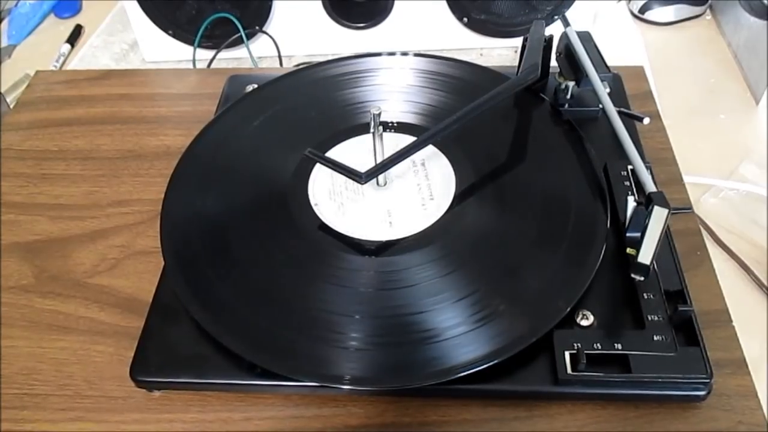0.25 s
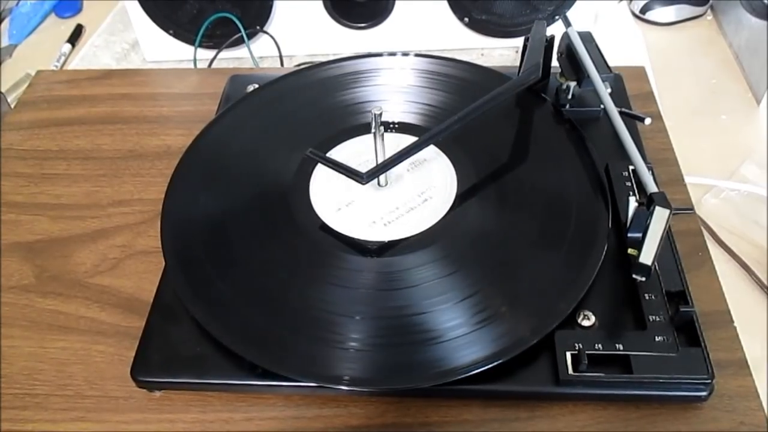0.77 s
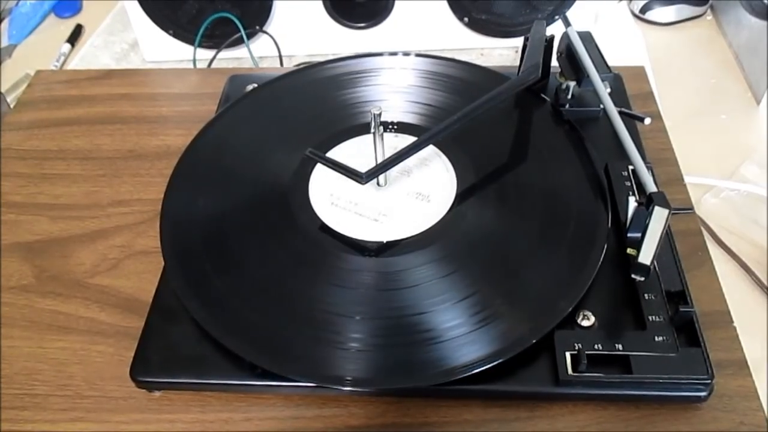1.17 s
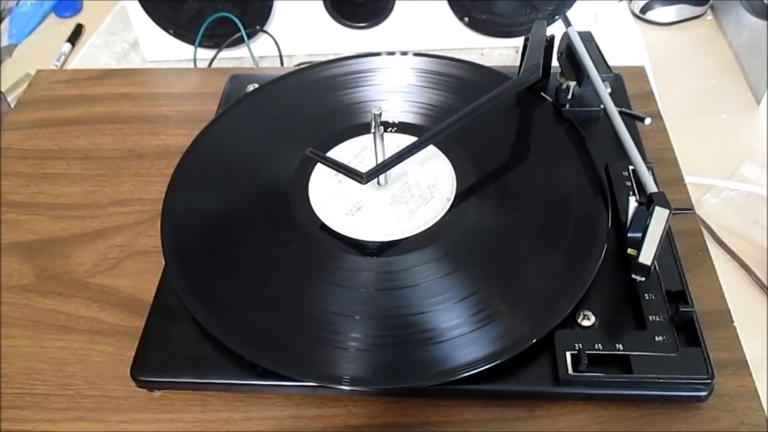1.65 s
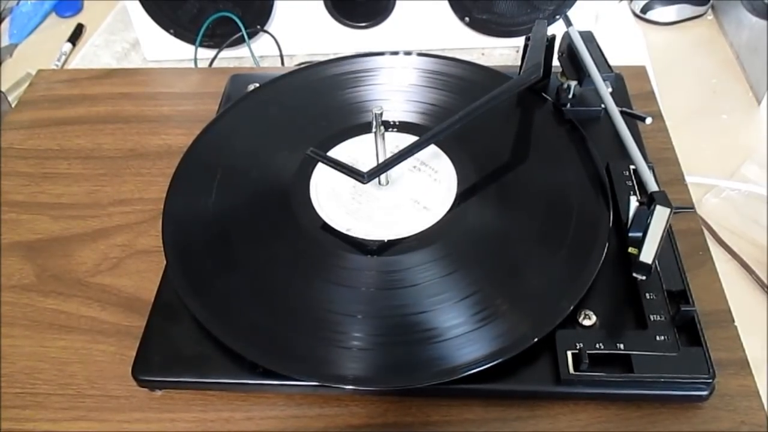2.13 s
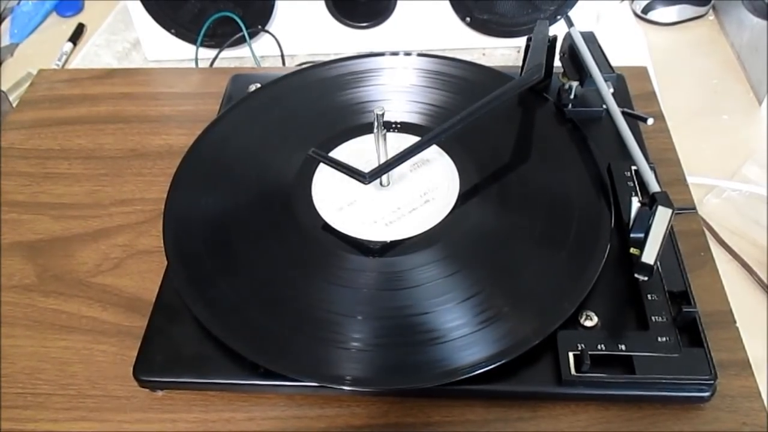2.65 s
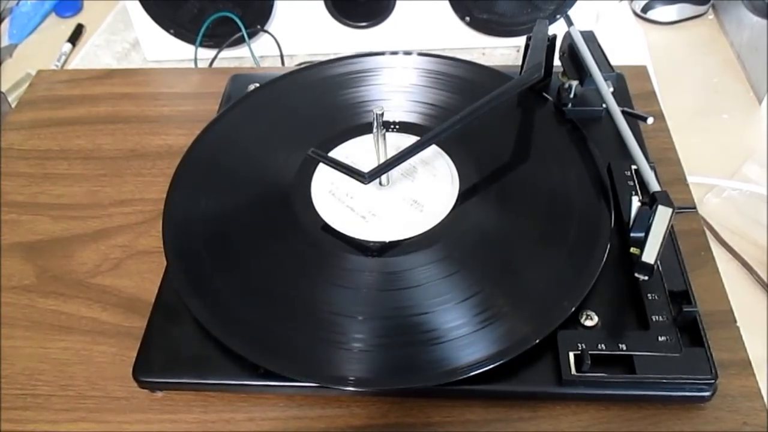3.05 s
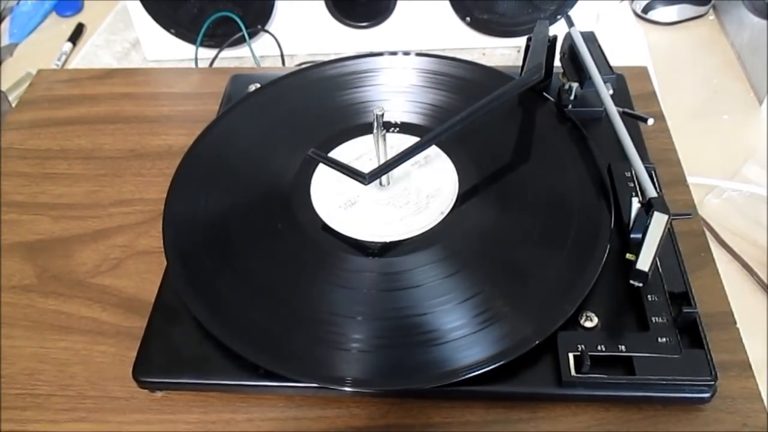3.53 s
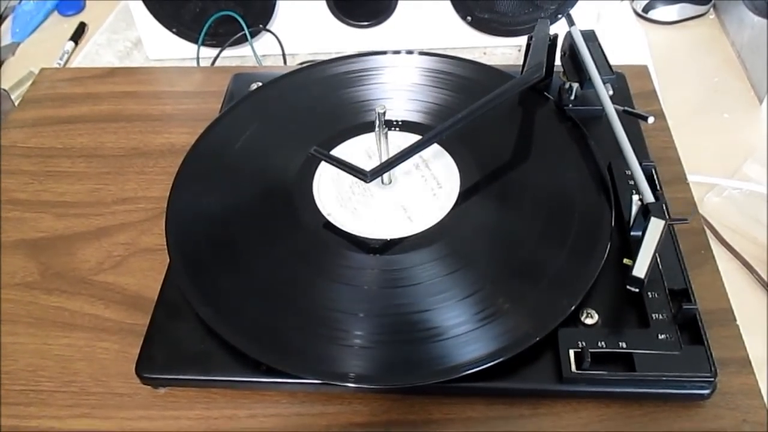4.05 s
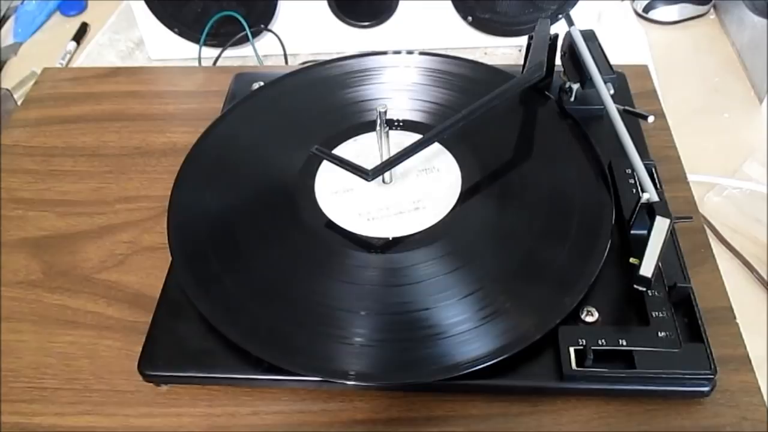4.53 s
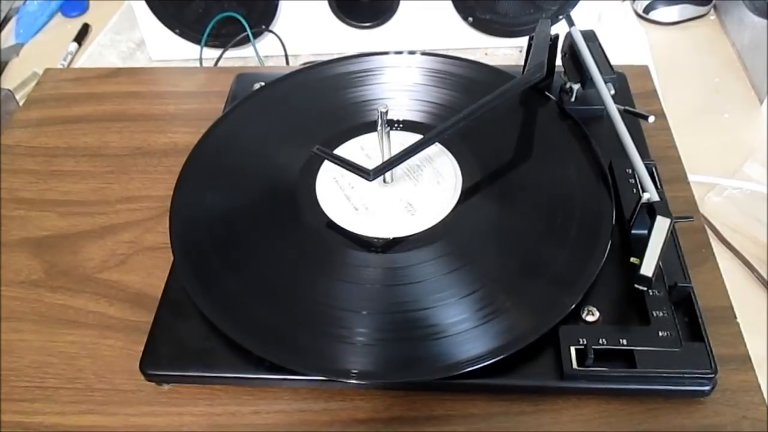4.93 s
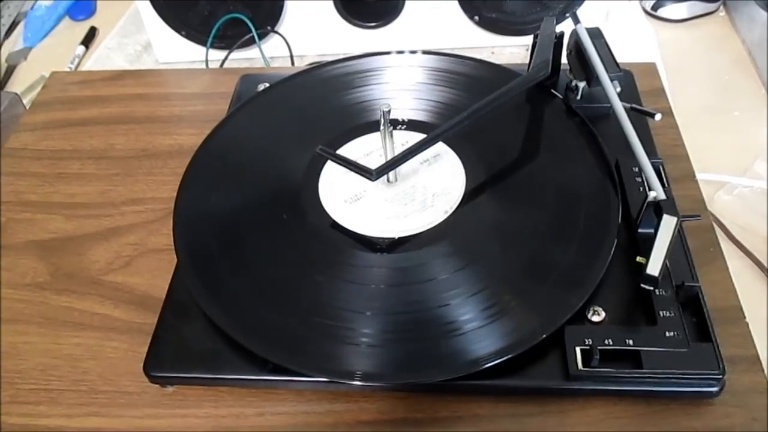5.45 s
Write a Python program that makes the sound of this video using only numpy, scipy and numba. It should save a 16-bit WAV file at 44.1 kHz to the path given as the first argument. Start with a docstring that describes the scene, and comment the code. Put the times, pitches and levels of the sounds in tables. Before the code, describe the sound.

A record changer turntable hums and rumbles, its metal levers clicking and knocking irregularly before one loud clunk.

```python
"""A small room: a record changer runs through its cycle. The motor hums, the platter rumbles, the
idler wheel scuffs. Steel levers click and knock on the deck; at last a sprung lever snaps home
and the wooden plinth booms. The clunk overloads the camera, whose gain ducks and creeps back;
its electronics hiss and whine faintly."""
import sys
import numpy as np
from scipy import signal
from scipy.fft import rfft, irfft, next_fast_len
from scipy.io import wavfile
from scipy.ndimage import map_coordinates
from numba import njit

SR = 44100
rng = np.random.default_rng(int(sys.argv[2]) if len(sys.argv) > 2 else 0)


def int16_out(signal):
    """Quantize to a 16-bit WAV file."""
    q = np.round(np.clip(np.atleast_2d(signal).T, -1, 1) * 32767)
    wavfile.write(sys.argv[1], SR, q.astype(np.int16))


N = 250532


def clunk():
    """Heavy blows make the plinth boom; the last is the sprung lever hitting its stop."""
    # blows on the plinth: t/s, level/dB
    thuds = [(2.047, -33), (3.739, -31.5), (4.182, -33.5), (4.4264, -11), (4.4487, 3)]
    # modes of plinth and deck springs: f/Hz, level/dB, t60/s
    plinth_modes = [(65.6, -24, .3), (136, -14, 0.18), (185.5, -6, 0.15), (221, -5.5, 0.19),
                    (272, 3, 0.048), (336, -12.5, .42), (361.6, -3.5, .06), (404, -8.5, 0.039),
                    (500, -13.5, .07), (1320, -40.5, 0.5)]
    out = np.zeros(N)
    for start_s, db in thuds:
        boom = amp(db) * ring(plinth_modes, attack_s=0.0007, scatter_db=0, disorder_rad=0.41)
        add(out, start_s, room(boom, wet_db=-14))
    low_cut_hz = 115  # a small box radiates little deep bass
    return signal.sosfilt(signal.butter(2, low_cut_hz, "high", fs=SR, output="sos"), out)


def sprung_lever():
    """The lever leaves its catch, bounces faster and harder along its guide, then hits the stop."""
    # catch, stop: t/s, clack level/dB, centre f/Hz, tick level/dB, knock level/dB
    snaps = [(4.4264, -7.5, 1420, -20.5, -20), (4.4472, -6, 1187, -19, 2.5)]
    out = np.zeros(N)
    pressed_t60_s = 0.03  # pressed against catch or stop, it rings only briefly
    damping = amp(-60 * np.arange(SR // 2) / SR / pressed_t60_s)
    for start_s, db, centre_hz, tick_db, knock_db in snaps:
        add(out, start_s, room(clack(db, centre_hz) * damping, wet_db=-10))
        add(out, start_s, room(tick(tick_db, t60_s=0.01), wet_db=-10.5))
        add(out, start_s, room(knock(knock_db), wet_db=-13.5))
    bounce_s, flight_s = snaps[0][0], 0.0088
    for db in (-27, -21.5):
        bounce_s += flight_s
        flight_s *= 0.7
        bounce = clack(db, centre_hz=3200) + tick(db - 8) + knock(db + 4)
        add(out, bounce_s, room(bounce, wet_db=-8.5))
    return out


def levers():
    """Each lever touches, swings the deck and seats with a duller clack; a light pawl ticks thinly."""
    # lever clacks and knocks, then two faint ticks after the clunk:
    # t/s, clack level/dB, centre f/Hz, knock level/dB
    contacts = [(1.2381, -19, 2480, -18.5), (1.627, -56, 1310, -40.5), (1.9088, -41.5, 1290, -36),
                (2.0447, -60, 3450, -34), (2.928, -48, 1260, -32), (3.168, -43.5, 1380, -40),
                (3.354, -32, 2070, -38), (3.44, -43.5, 1490, -36.5), (3.566, -49, 1500, -33.5),
                (3.727, -42, 2980, -46), (3.738, -30.5, 1247, -19.5), (3.7512, -26.5, 1640, -30),
                (3.856, -32.5, 2000, -35), (3.8795, -49, 3600, -47), (3.9653, -52, 3140, -51),
                (4.083, -53, 3660, -53.5), (4.1805, -38, 1156, -23.5), (4.342, -58.5, 2600, -43),
                (4.4053, -29.5, 1923, -25.5), (5.552, -57.5, 3420, -63), (5.653, -55, 1290, -56)]
    # pawl drops: t/s, tick level/dB
    pawl_drops = [(2.0431, -53.5), (3.445, -60), (3.8944, -49), (4.4236, -37.5)]
    seat_lag_s, deck_lag_s = 0.0032, 0.0015
    out = np.zeros(N)
    for start_s, db, centre_hz, knock_db in contacts:
        tick_db = db - 33.5 + 25 * np.log2(centre_hz / 1880)  # harder contacts tick more
        sound = clack(db, centre_hz) + tick(tick_db)
        add(sound, seat_lag_s, clack(db - 5.5, 0.75 * centre_hz))
        add(sound, deck_lag_s, knock(knock_db))
        add(out, start_s, room(sound, wet_db=-14.5))
    for start_s, db in pawl_drops:
        pawl = tick(db) + clack(db - 2, centre_hz=4800)
        add(out, start_s, room(pawl, wet_db=-13.5))
    return out


def clack(db, centre_hz):
    """Steel on steel: ringing lever modes and a crack of noise, weighted towards centre_hz."""
    # steel lever modes: f/Hz, level/dB, t60/s
    lever_modes = [(847, -7, 0.054), (1015, 2, 0.029), (1339.2, -1, 0.09), (1436, 0, 0.055),
                   (1623, 6.5, 0.032), (1750, -9.5, 0.039), (2064, -8.5, 0.05), (2480, -2, 0.027),
                   (2675, -5.5, .036), (2722, -9.5, 0.023), (2870, -8, .035), (3240, -14.5, 0.076),
                   (4470, -12.5, .04), (4630, -13.5, 0.06), (5300, -12, 0.03), (6440, -20.5, 0.09)]
    # impact spectrum: f/Hz, level/dB
    crack_spectrum = [(200, -27), (500, 0.5), (1000, 2), (1700, 2.5), (2800, -4), (4700, -3.5),
                      (6000, -12.5), (9000, -13.5), (16000, -30.5)]
    steel = ring(favour(lever_modes, centre_hz), attack_s=0.00036, scatter_db=1.5, disorder_rad=1.7)
    crack = burst(favour(crack_spectrum, centre_hz), t60_s=0.038, attack_s=0.0004)
    return amp(db) * unit_blow(steel + amp(-2) * crack)


def tick(db, t60_s=0.017):
    """The sharp edge of a contact; the shorter it is, the faster it rises."""
    # contact spectrum: f/Hz, level/dB
    tick_spectrum = [(1500, -14.5), (3200, 6.5), (4800, -1), (7800, -0.5), (11000, -13), (14000, -13),
                     (17000, -19)]
    return amp(db) * burst(tick_spectrum, t60_s, attack_s=t60_s / 40)


def knock(db):
    """The sheet-steel deck swings up and dies away."""
    # deck modes: f/Hz, level/dB, t60/s
    deck_modes = [(237, -12, 0.092), (315, -12.5, 0.077), (347, -0.5, 0.065), (410, -8, 0.066),
                  (508, -12.5, 0.063), (635, -21.5, 0.024)]
    return amp(db) * ring(deck_modes, attack_s=0.0044, scatter_db=4, disorder_rad=0.8)


def chatter():
    """Loose linkage touches faintly at uneven moments while the cam turns."""
    from_s, to_s, contacts_per_s = 0.94, 4.3, 3.5
    out = np.zeros(N)
    for slot_s in np.arange(from_s, to_s, 1 / contacts_per_s):
        db = -57.5 + 0.5 * rng.standard_normal()
        sound = clack(db, centre_hz=1600) + knock(db + 14)
        add(out, slot_s + rng.random() / contacts_per_s, room(sound, wet_db=-15))
    return out


def motor():
    """Unsteady hum lines over bearing rumble that follows the load on the drive."""
    # lines of motor, idler wheel and mains: f/Hz, rms level/dB
    hum_lines = [(37.5, -58), (59.5, -52), (100, -60.5), (119.8, -52), (140, -62), (179.8, -59.5),
                 (239.8, -56.5)]
    # platter bearing through the deck: f/Hz, level/dB
    rumble_spectrum = [(15, -5), (23, 2), (30, -3.5), (45, -1), (58, 8.5), (85, -2), (135, -5), (200, -3),
                       (280, -2), (312, -8.5), (345, -1.5), (395, -0.5), (430, -9.5), (1200, -51.5)]
    # load on the drive: t/s, rumble level/dB
    drive_load = [(0, -52), (1, -49), (2.5, -50.5), (3.5, -46), (4.4, -47.5), (4.7, -52.5), (5.68, -54.5)]
    t = np.arange(N) / SR
    hum = np.zeros(N)
    for hz, db in hum_lines:
        peak = np.sqrt(2) * amp(db + 1.2 * wobble(4.4))
        hum += peak * np.sin(2 * np.pi * (hz * t + rng.random()) + 0.23 * wobble(14))
    rumble = amp(curve(drive_load) + 2.3 * wobble(21)) * noise(rumble_spectrum, N)
    return hum + rumble


def idler():
    """The idler wheel scuffs once a turn, with varying force."""
    # light rubbing of the wheel: t/s, level/dB
    rub_levels = [(0, -98), (.2, -74), (.33, -63.5), (.7, -68), (1, -68), (1.2, -75), (2, -70.5),
                  (5.68, -74)]
    # friction spectrum: f/Hz, level/dB
    scuff_spectrum = [(900, -24.5), (1600, -4), (2000, -9), (2130, 5), (2280, -12.5), (2550, -3.5),
                      (2850, -3), (3200, -16), (6000, -35.5)]
    t = np.arange(N) / SR
    turn_hz = 19.3
    angle_rad = 2 * np.pi * turn_hz * (t - 0.248) + 0.35 * wobble(5)
    stroke = (0.5 + 0.5 * np.cos(angle_rad)) ** 1.7
    force = amp(3.5 * wobble(16))
    return amp(curve(rub_levels)) * unit_rms(stroke * force) * noise(scuff_spectrum, N)


def electronics():
    """Hiss and two thin whines, their pitch shaken in step with the camera's frames."""
    # circuit hiss: f/Hz, level/dB
    hiss_spectrum = [(260, -29.5), (450, -1.5), (600, -2), (1000, -1), (1500, -5), (2900, -12),
                     (4200, -14.5), (7000, -19.5), (10500, -26), (13000, -29), (15800, -40.5)]
    frame_hz, jolt_hz, low_hz, high_hz = 29.95, 280, 3941, 11794
    t = np.arange(N) / SR
    since_jolt_s = t % (0.5 / frame_hz)
    jolt_rad = 1.6 * np.sin(2 * np.pi * jolt_hz * since_jolt_s) * (since_jolt_s < 0.007)
    shake_rad = jolt_rad + 0.6 * np.sin(2 * np.pi * frame_hz * t)
    high = np.sin(2 * np.pi * high_hz * t + shake_rad)
    low = np.sin(2 * np.pi * low_hz * t + shake_rad * low_hz / high_hz)
    return amp(-69.5) * (high + low) + amp(-57.5) * noise(hiss_spectrum, N)


def room(x, wet_db):
    """A blow plus its wall reflections, a tail of decaying noise."""
    # room decay: f/Hz, t60/s
    decay = [(120, 0.67), (350, 0.46), (1500, 0.35), (4500, 0.32), (8000, 0.36), (13000, 0.16)]
    # colour of the reflections: f/Hz, level/dB
    colour = [(100, 0.5), (350, -1.5), (1500, -3), (5000, -6), (8000, -8), (12000, -9.5)]
    build_up_s = 0.0025
    hz, t, bins = signal.stft(rng.standard_normal(SR * 3 // 4), SR, nperseg=256)
    fade = amp(along(colour, hz)[:, None] - 60 * t / along(decay, hz)[:, None])
    tail = signal.istft(bins * fade * (1 - np.exp(-t / build_up_s)), SR, nperseg=256)[1]
    echo = signal.fftconvolve(x, tail / np.linalg.norm(tail))[:len(tail)]
    return np.pad(x, (0, len(tail) - len(x))) + amp(wet_db) * echo


@njit
def gain_cut_db(x, limit, depth_db, attack_s, hold_s, release_s):
    """An overload pulls the gain down, holds it, then lets it creep back."""
    cut_db, now_db, left_s = np.zeros(len(x)), 0., 0.
    for i in range(len(x)):
        left_s = hold_s if abs(x[i]) > limit else left_s - 1 / SR
        if left_s > 0:
            now_db += (depth_db - now_db) / (attack_s * SR)
        else:
            now_db -= now_db / (release_s * SR)
        cut_db[i] = now_db
    return cut_db


def ring(modes, attack_s, scatter_db, disorder_rad):
    """Struck, damped modes with random spread in level and phase."""
    t = np.arange(SR // 2) / SR
    swing = np.zeros(len(t))
    for hz, db, t60_s in modes:
        envelope = amp(db + scatter_db * rng.standard_normal() - 60 * t / t60_s)
        swing += envelope * np.sin(2 * np.pi * hz * t + disorder_rad * rng.standard_normal())
    return unit_blow(swing * np.tanh(t / attack_s) ** 2)


def burst(spectrum, t60_s, attack_s):
    """Crowded modes that die together, as decaying noise."""
    t = np.arange(SR // 2) / SR
    envelope = amp(-60 * t / t60_s) * np.tanh(t / attack_s) ** 2
    return unit_blow(noise(spectrum, len(t)) * envelope)


def favour(rows, centre_hz):
    """A point of contact favours modes near its centre: 10 dB less one octave away."""
    return [(hz, db - 10 * np.log2(hz / centre_hz) ** 2, *rest) for hz, db, *rest in rows]


def noise(spectrum, size):
    """Coloured noise of rms 1."""
    n_fft = next_fast_len(size + 8192)
    gain = amp(along(spectrum, np.fft.rfftfreq(n_fft, 1 / SR)))
    return unit_rms(irfft(rfft(rng.standard_normal(n_fft)) * gain, n_fft)[:size])


def wobble(rate_hz):
    """Smooth random curve with knots at rate_hz."""
    knots = rng.standard_normal(int(N * rate_hz / SR) + 4)
    return map_coordinates(knots, [np.arange(N) * rate_hz / SR])


def along(rows, hz):
    """Read (f/Hz, value) rows on a log axis."""
    row_hz, values = np.transpose(rows)
    return np.interp(np.log(hz + 1), np.log(row_hz + 1), values)


def curve(rows):
    """(t/s, value) rows as one value per sample."""
    return np.interp(np.arange(N) / SR, *np.transpose(rows))


def add(track, start_s, sound):
    """Mix a sound into the track."""
    part = track[round(start_s * SR):][:len(sound)]
    part += sound[:len(part)]


def amp(db):
    """Decibels to gain."""
    return 10 ** (np.asarray(db) / 20)


def unit_rms(x):
    """Scale to rms 1."""
    return x / np.sqrt(np.mean(x ** 2) + 1e-20)


def unit_blow(x):
    """Scale to the energy of 10 ms at rms 1."""
    return x / np.sqrt(np.sum(x ** 2) / (SR / 100))


def scene():
    """Mechanism, drive and the camera's own noise, in mono."""
    return (levers() + sprung_lever() + clunk() + motor() + idler() + electronics() + chatter())[None]


def record(dry):
    """Gain control, clipping at full scale, band limit."""
    x = dry[0]
    cut_db = gain_cut_db(x, limit=1.0, depth_db=18.5, attack_s=0.032, hold_s=0.33, release_s=1.0)
    clipped = np.clip(x * amp(-cut_db), -1, 1)
    top_hz = 15900
    return signal.sosfilt(signal.cheby1(12, 0.1, top_hz, fs=SR, output="sos"), clipped)[None]


dry = scene()
out = record(dry)
int16_out(out)
```